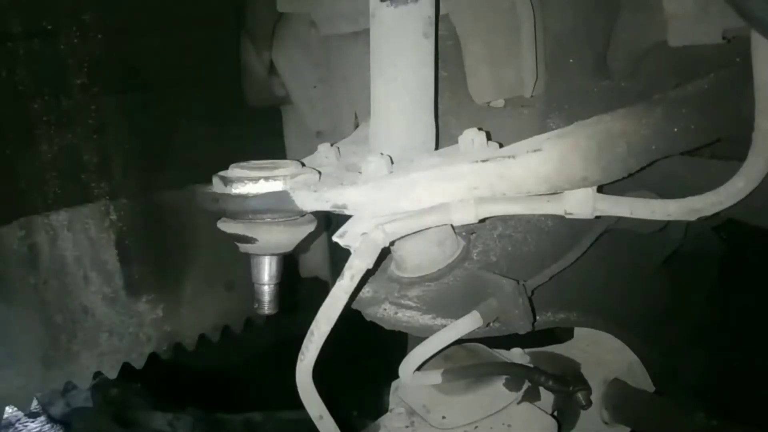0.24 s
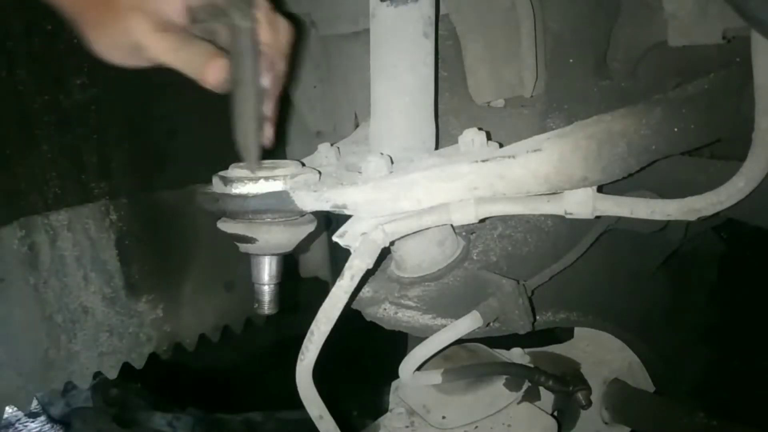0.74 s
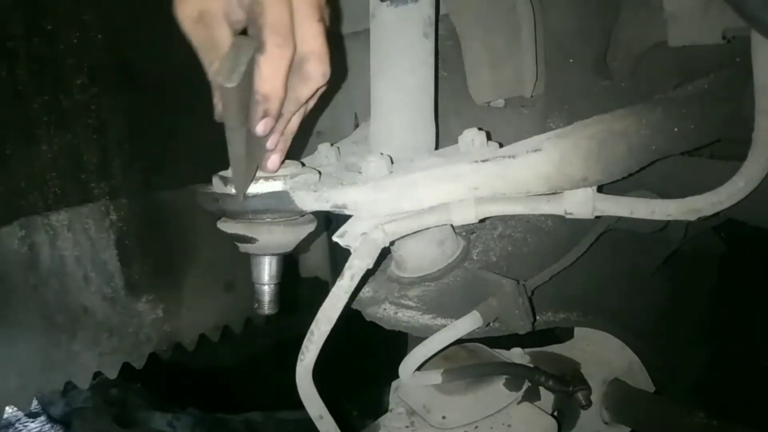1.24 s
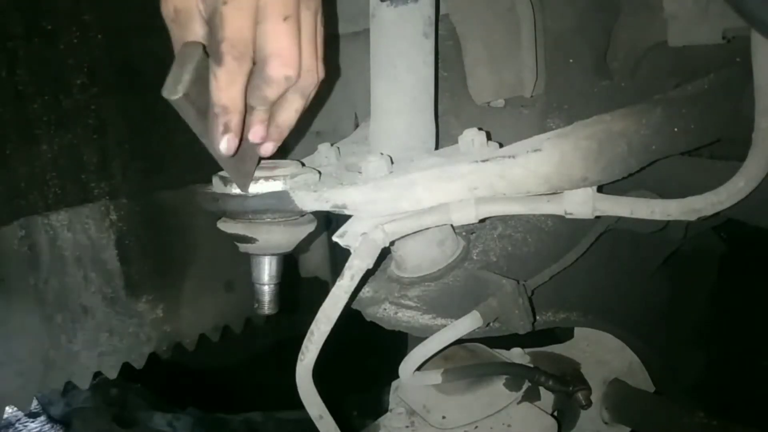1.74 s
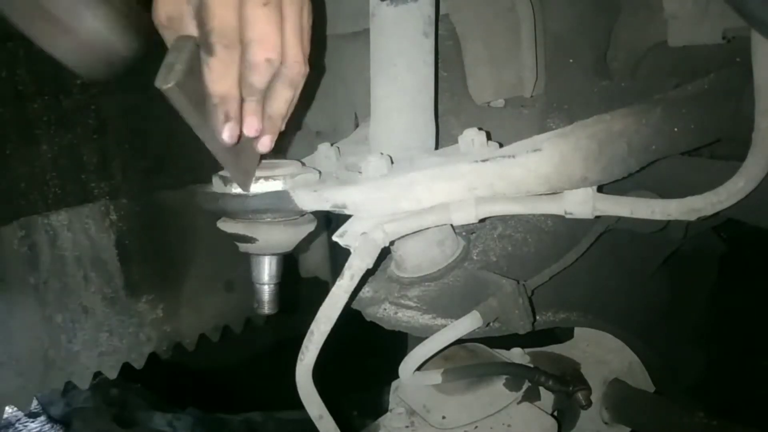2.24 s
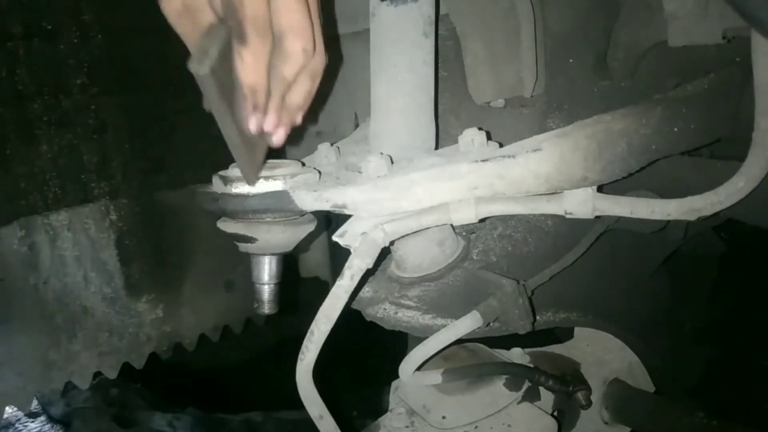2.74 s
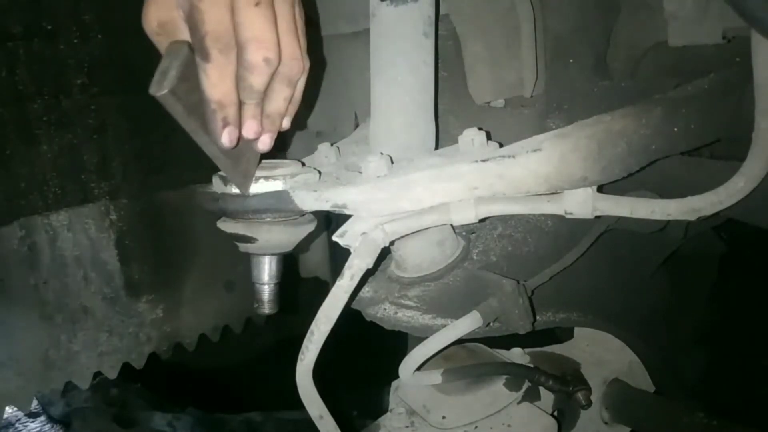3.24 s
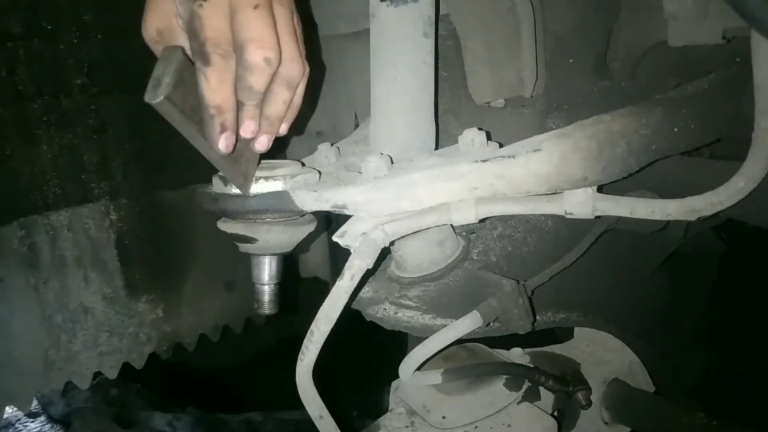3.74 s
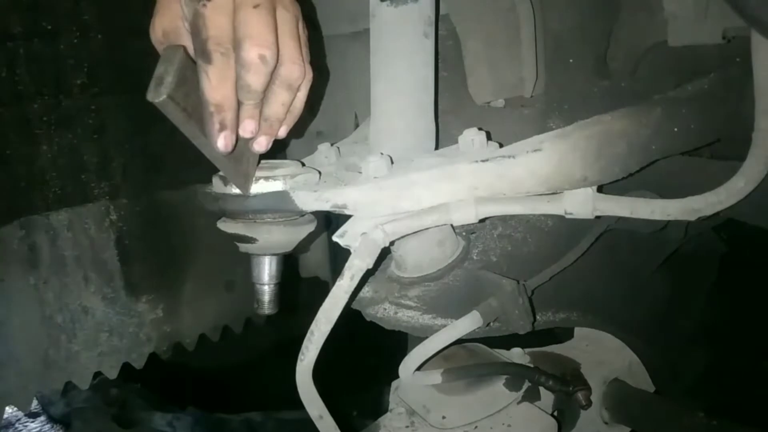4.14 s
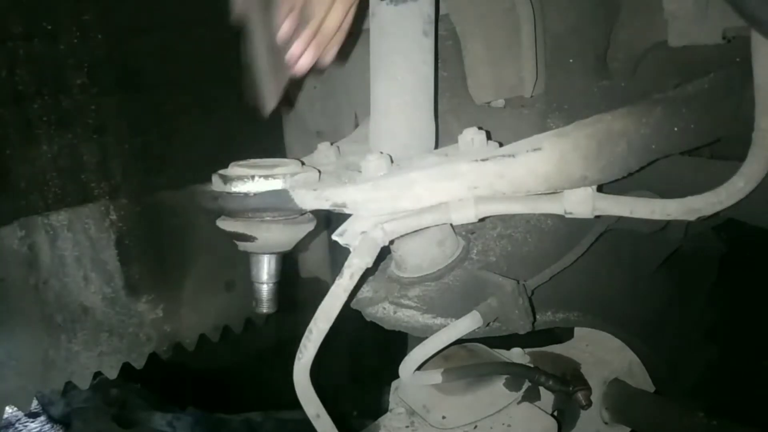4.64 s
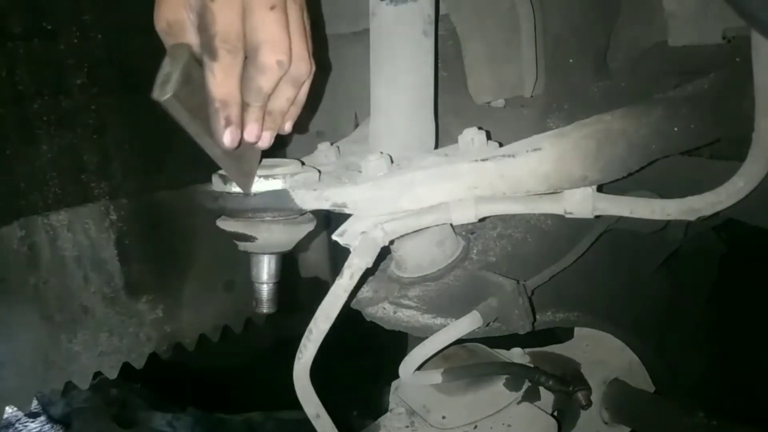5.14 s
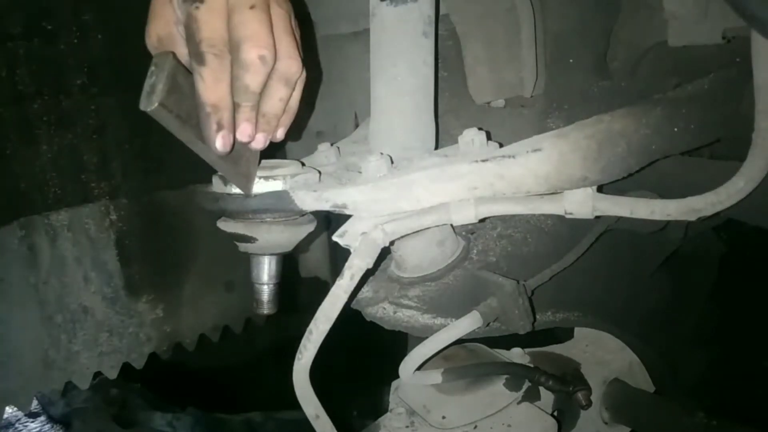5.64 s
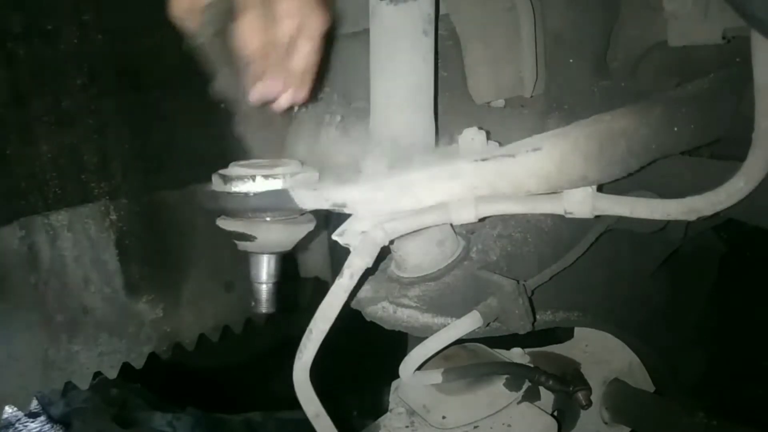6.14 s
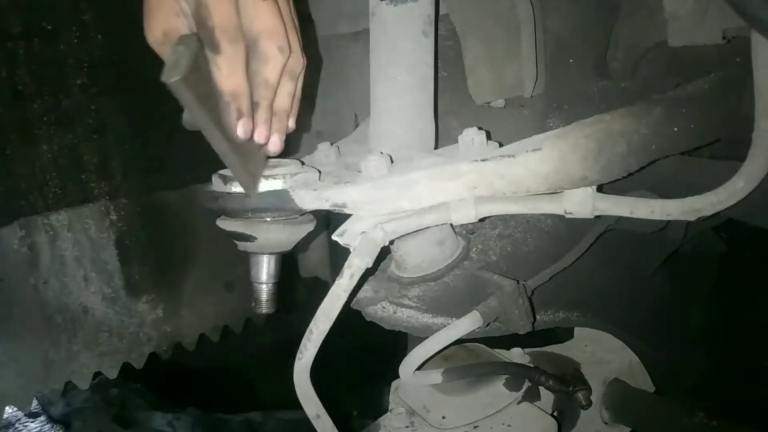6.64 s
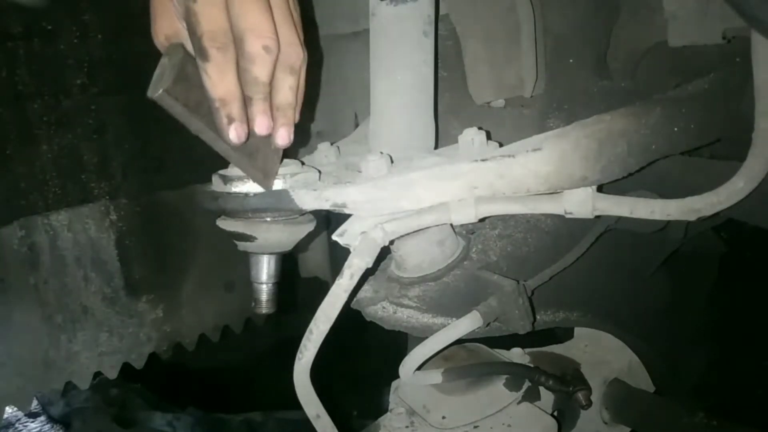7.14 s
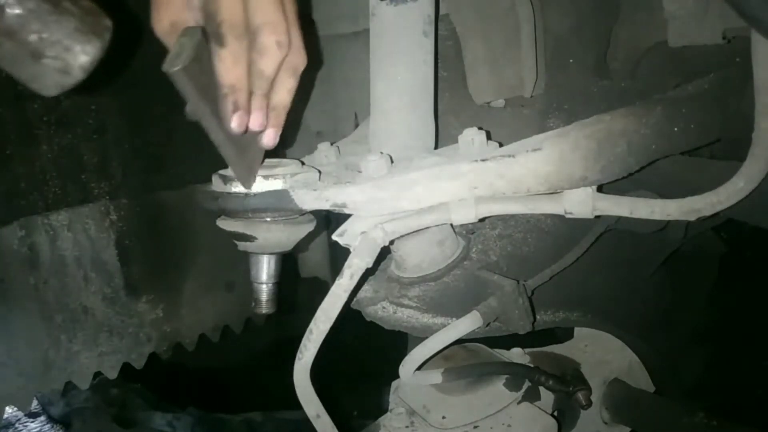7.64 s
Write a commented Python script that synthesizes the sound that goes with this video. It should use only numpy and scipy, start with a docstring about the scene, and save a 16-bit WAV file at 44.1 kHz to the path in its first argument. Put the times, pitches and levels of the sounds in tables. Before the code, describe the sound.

In a quiet workshop, fingers and steel scrape softly and a chisel tip knocks dully onto a suspension joint. Six loud hammer blows follow at uneven intervals, dense bright clangs with short rings and a brief room tail, clipping the close microphones. Between blows the tip ticks and clinks as it is set back in place over low hiss and rumble.

```python
"""Chisel blows on a suspension joint

A hammer drives a hand-held steel chisel against the joint in a quiet workshop, close to two microphones.
Each blow is a dense clang (shaped noise), clear rings (clusters of decaying modes) and a room tail; it
overloads the microphones (hard clipping). Around the blows the chisel tip taps and fingers and steel scrape
(clicks, grainy noise) over a hiss, a rumble and a thin whine (filtered noise)."""
import sys
import numpy as np
from scipy import signal
from scipy.fft import rfft, irfft, next_fast_len
from scipy.io import wavfile
from scipy.ndimage import uniform_filter1d

SR = 44100
rng = np.random.default_rng(int(sys.argv[2]) if len(sys.argv) > 2 else 0)


def put_to_file(sound):
    """Save the sound as 16-bit audio at rate SR, in the file named by the first command-line argument."""
    columns = np.atleast_2d(sound).T  # one column per channel
    safe = np.clip(columns, -1, 1)
    whole_steps = np.round(safe * 32767)
    wavfile.write(sys.argv[1], SR, whole_steps.astype(np.int16))


N = 347463

# Workshop noise spectrum, relative density: frequency_hz, density_db
FLOOR_SPECTRUM = [(15, 1.5), (28, -2), (45, -3.5), (100, -15), (250, -16), (600, -19.5), (1300, -20),
                  (3000, -28), (5000, -32), (8000, -32), (12000, -38), (15500, -41)]
# Steady tones of machines far off: centre_hz, width_hz, level_db
HUMS = [(126, 18, -66.5), (510.5, 11, -70), (824, 13, -70.5), (1460, 11, -62.5)]
# Likeness of the noise in the two channels: frequency_hz, correlation (-1 to 1)
LIKENESS = [(60, 0.92), (150, 0.88), (380, 0.54), (950, -0.19), (2380, -0.077), (5980, 0.18), (15000, 0.29)]
# Fingers and steel slide over each other: start_s, length_s, level_db, tilt_db_per_octave
SLIDES = [(0.001, 0.046, -50, -.5), (0.138, 0.27, -56.5, 1.5), (0.553, .02, -55.5, 3),
          (1.07, 0.08, -42, -3.5), (1.329, .12, -50, 3.5), (1.502, 0.17, -60.5, -1),
          (1.634, .03, -53.5, 3.5), (7.123, 0.13, -52.5, -7), (7.678, 0.045, -56, .6)]
# Clang spectrum, relative density: frequency_hz, density_db
CLANG_SPECTRUM = [(30, 5), (150, 0.5), (500, -1), (1100, 2.5), (2500, -0.5), (4500, -4), (7500, 2.5),
                  (9500, -1), (12000, -8.5), (15500, -2)]
# Decay of the steel before damping: frequency_hz, t60_s
STEEL_T60 = [(60, 0.74), (200, 0.95), (500, 0.18), (1200, 0.24), (3000, 0.23), (7000, 0.21), (11000, .15),
             (15500, 0.16)]
# Decay of the room: frequency_hz, t60_s
ROOM_T60 = [(60, 1.15), (200, .85), (600, 0.61), (2000, 0.55), (7000, 0.71), (15500, 0.4)]
# Modes that ring: part (0 chisel lengthwise, 1 hammer, 2 joint, 3 knuckle, 4 arm, 5 chisel tip,
# 6 chisel bending, 7 strut, 8 bolts), pitch_hz, spread_hz of its close modes,
# level_db over its part, t60_s before damping, left_minus_right_db
RINGS = [(0, 8353, 20, -4, .36, 0), (0, 8389, 20, -4, .36, 0), (1, 8672, 26, -4, .26, 0),
         (2, 1073, 14, -3, .9, 0.1), (2, 1120, 70, -.5, .2, 0.1), (2, 1846, 50, -11, .4, 0.1),
         (2, 2650, 120, -2.5, .25, 0.1), (2, 585, 30, -7, .6, 0.1), (3, 6660, 80, -.1, .5, 3),
         (4, 545, 35, 1.5, .6, 0.1), (4, 245, 30, -.5, .6, 0.1), (4, 165, 20, -2, .65, 0.1),
         (5, 5780, 150, -.1, .3, 0.1), (5, 9120, 70, -13, .35, 0.1), (5, 14850, 90, -10, .2, 0.1),
         (6, 3080, 85, -2.5, .5, 0.1), (7, 7500, 190, -.1, .25, 3), (7, 7900, 60, -6, .3, 0.1),
         (8, 10640, 160, -.1, .4, -3), (8, 11870, 60, -9, .3, -1), (8, 14300, 150, -5, .27, 0.1)]
# What drives each part, in part order: driver (rounds to 0 tools, 1 joint, 2 knuckle, 3 clang),
# level_db over the driver, change_db per doubling of ring-out up to 1
PARTS = [(0, -1, 1.3), (-0.5, 1, .1), (1, -2, 4.5), (2, 0.5, 3.4), (3, -15.5, 10), (2, -8.5, -1.1),
         (0.5, -12, -1), (1, 3.5, -1), (2, -5.5, 24)]
# The tip touches the joint: start_s, click_db, tilt_db_per_octave, joint_ring_db, tip_ring_db
TAPS = [(0.5825, -35, -8, -40, -66), (0.7667, -27, -11.5, -37.5, -68), (1.078, -22, -15, -39.5, -53),
        (1.139, -46, 0, -58, -63), (2.7137, -50, -6, -48.5, -50), (2.7893, -44.5, -12, -53, -38),
        (2.794, -36, -4.5, -46, -55), (2.848, -47, -4.5, -57, -43), (2.934, -42, -5.5, -59, -56),
        (3.0108, -32, 0, -47, -40), (3.0401, -35.5, 1, -50, -50), (4.265, -43, 7, -70, -66),
        (4.366, -45, -3.5, -70, -66), (4.7223, -37, -5.5, -48, -44), (4.7385, -30, -6, -50, -38),
        (6.3865, -44, -2.5, -42, -67), (6.768, -68, 1.5, -54, -47.5), (6.9448, -53, 3, -47, -62),
        (7.121, -55, -6, -50, -62), (7.165, -54, -3, -45, -50), (7.19, -55, -6, -51, -63),
        (7.4202, -33, -5.5, -42, -37)]
# Lone bright pings of small parts: start_s, pitch_hz, level_db, t60_s
PINGS = [(3.0108, 4750, -33, 0.076), (3.0408, 4660, -43, 0.06), (7.057, 11450, -49.5, 0.26)]
# Hammer blows: middle_of_rise_s, clang_db, crack_db over it, rise_s, skid_s of the chisel,
# ring_out (decay factor), tools_ring_db, joint_ring_db, knuckle_ring_db,
# left_swing and right_swing (full scale, before the high-pass), left_lag_s
BLOWS = [(1.9255, -11.5, 11.5, 0.0019, 0.011, 1, -7, -39, -21, 0.71, .13, .001),
         (3.327, -9, 11, 0.0027, 0.0046, 0.55, -22, -28, -24, .03, -.06, .002),
         (3.989, -7.5, -3, 0.0077, 0.012, 1.39, -7, -22, -28, 0.4, 0.62, 0.037),
         (5.1432, -8.5, 1, 0.0014, 0.0051, 0.55, -25, -27, -27, 0.00073, -.075, .002),
         (5.823, -6.5, 0, .006, 0.022, 1.316, -19, -23, -12, -.14, -.1, 0.01),
         (7.789, -10.5, -0.5, 0.0009, 0.0058, 0.42, -34, -31, -27, 0.064, 0.0033, .001)]
# Air pocket before the left and right capsule: centre_hz, width_hz, gain_db
PORTS = [(6770, 1600, 9.5), (10930, 1600, 12.5)]

HZ = np.fft.rfftfreq(512, 1 / SR)[:, None]  # bins of the short-time frames
FLOOR_DB = -50  # before the hums, the waver and the ports
RUSTLE_LOW_HZ = 905
SLIDE_RISE_DB_PER_S, SLIDE_FADE_DB, SLIDE_STOP_DB_PER_S = 350, -6, 299.5
ROOM_TILT_DB = -2.5  # per octave: the walls swallow treble
CLICK_T60_FACTOR, HELD_T60_FACTOR = 0.4, 0.27  # steel of a tap's click, rings under the hand
# each follows the ring-out: (value at ring-out 1, change per doubling)
TILT_DB, THUD_DB, ROOM_DB, FREE_DB = (-0.83, 1.5), (-2.5, 6.5), (-7.5, 9.5), (4, -11)
RING_OUT_POWER = .25  # rings lengthen less than the clang does
SWING_S = .07
EDGE_HZ = 15773  # upper band limit


def gain_of(db):
    """Level law: 20 dB is a tenfold amplitude."""
    return 10 ** (np.asarray(db) / 20)


def read(points, hz):
    """Interpolation of a spectrum or decay table on a log-frequency axis."""
    table_hz, value = np.transpose(points)
    return np.interp(np.log(hz + 1), np.log(table_hz + 1), value)


def follow(rule, ring_out):
    """Logarithmic law: a value moves by a fixed step per doubling of ring-out."""
    return rule[0] + rule[1] * np.log2(ring_out)


def add(mix, s, sound):
    """Superposition: a sound is summed into the mix from s seconds on."""
    part = mix[:, round(s * SR):][:, :sound.shape[1]]
    part += sound[:, :part.shape[1]]


def frame_times(count):
    """Time grid of the short-time frames that cover count samples."""
    return np.arange(count // 128 + 5) * 128 / SR


def likened(first, second, hz):
    """Partial coherence: the right channel shares a set part of the left at each frequency."""
    same = np.clip(read(LIKENESS, hz), -1, 1)
    return np.array([first, same * first + np.sqrt(1 - same ** 2) * second])


def noise(magnitude, count):
    """Short-time synthesis of noise from frequency x time; a unit-length column gives about rms 1."""
    a, b, c, d = rng.standard_normal(magnitude.shape[::-1] + (4,)).T
    spectrum = likened(a + 1j * b, c + 1j * d, HZ) * magnitude
    return signal.istft(spectrum, nperseg=512, noverlap=384)[1][:, :count]


def tilted(db, tilt_db):
    """Spectral tilt: a spectrum leans about 4 kHz and is scaled to unit length."""
    gain = gain_of(db + tilt_db * np.log2((HZ + 300) / 4000))
    return gain / np.linalg.norm(gain, axis=0)


def workshop():
    """Stationary noise: hiss, rumble and narrow bands of far machines under a wavering level."""
    size = next_fast_len(N)
    hz = np.fft.rfftfreq(size, 1 / SR)
    first, second = rfft(rng.standard_normal((2, size)))
    shape = gain_of(read(FLOOR_SPECTRUM, hz)) * (hz > 9)
    power = gain_of(2 * FLOOR_DB) * shape ** 2 / np.mean(shape ** 2)
    for centre_hz, width_hz, db in HUMS:
        line = 1 / (1 + (2 * (hz - centre_hz) / width_hz) ** 4)
        power = power + gain_of(2 * db) * line / np.mean(line)
    steady = irfft(likened(first, second, hz) * np.sqrt(power), size)[:, :N]
    waver = uniform_filter1d(uniform_filter1d(rng.standard_normal(N), 3000), 3000)
    return steady * gain_of(waver / waver.std())  # 1 dB rms


def rustle():
    """Sliding friction: grainy noise, thin in the bass, swells in, sags as it runs and stops."""
    t = frame_times(count=N)
    grain_db = 1.5 * rng.standard_normal(len(t))
    bass_cut_db = -10 * np.log10(1 + (RUSTLE_LOW_HZ / (HZ + 1)) ** 4)
    treble_cut_db = -10 * np.log10(1 + (HZ / 11000) ** 6)
    power = 0
    for s, length, db, tilt_db in SLIDES:
        swell_db = -SLIDE_RISE_DB_PER_S * np.maximum(s - t, 0)
        sag_db = SLIDE_FADE_DB * np.clip((t - s) / length, 0, 1)
        stop_db = -SLIDE_STOP_DB_PER_S * np.maximum(t - s - length, 0)
        level = gain_of(db + swell_db + sag_db + stop_db + grain_db)
        power = power + (tilted(bass_cut_db + treble_cut_db, tilt_db) * level) ** 2
    return noise(np.sqrt(power), count=N)


def attack(rise, count):
    """Contact force: a quick squared rise from the first touch."""
    return np.clip(np.arange(count) / SR / abs(rise), 0, 1) ** 2


def clang(db, crack_db, rise, skid, tilt_db, thud_db, damping, room_db, count):
    """Modal overlap: countless plate and rod modes blur to lumpy noise that dies by band, over a room tail."""
    t = frame_times(count=count)
    after = np.maximum(t - skid, 0)  # the steel is fed for as long as the tip skids
    # some modes are caught harder, some last longer
    loud, long = rng.standard_normal((2, len(HZ), 1)) * np.minimum(HZ / 1500, 1)
    steel_t60 = damping * read(STEEL_T60, HZ) * np.exp(.13 * long)
    steel = gain_of(3.5 * loud - 60 * after / steel_t60)
    room_colour_db = 1.3 * loud + ROOM_TILT_DB * np.log2((HZ + 300) / 2000)
    room = gain_of(room_db + room_colour_db - 60 * after / read(ROOM_T60, HZ))
    thud = gain_of(thud_db / (1 + (HZ / 330) ** 4))
    colour = tilted(read(CLANG_SPECTRUM, HZ), tilt_db) * thud
    build = np.minimum((t + 0.0019) * HZ / 5.2, 1)  # low modes need a few cycles to speak
    body = noise(colour * build * np.hypot(steel, room), count=count)
    crack = gain_of(crack_db * np.exp(-np.arange(count) / SR / 0.0053))
    return gain_of(db) * body * attack(rise, count=count) * crack


def ring(hz, spread_hz, db, t60, pan_db, count):
    """Beating: a leading mode and eight close ones die together, with other phases at each capsule."""
    t, step = np.arange(count) / SR, 8
    offsets, phases = spread_hz * rng.standard_normal((9, 1)), rng.uniform(0, 2 * np.pi, (2, 9))
    offsets[0] = 0
    # long waves reach both capsules nearly in step
    phases[1] = phases[0] + hz / 1400 * rng.standard_normal(9)
    weights = np.r_[1 + 35 / abs(spread_hz), np.ones(8)]  # in a tight cluster one mode rules
    turning = np.exp(2j * np.pi * offsets * t[::step])
    beats = weights * np.exp(1j * phases) @ turning / np.linalg.norm(weights)
    side_db = np.array([[pan_db], [-pan_db]]) / 2
    slow = beats * gain_of(db - 60 * t[::step] / t60 + side_db)
    return (np.repeat(slow, step, 1)[:, :count] * np.exp(2j * np.pi * hz * t)).real


def rings(part_db, damping, count):
    """Modal superposition: the parts named in part_db ring, each as hard as it was caught."""
    return sum(ring(hz, spread_hz, db + part_db[part], t60 * damping, pan_db, count=count)
               for part, hz, spread_hz, db, t60, pan_db in RINGS if part in part_db)


def taps():
    """Light impact: a short click, joint and tip damped by the hand, and lone pings of small parts."""
    out, count = np.zeros((2, N)), SR // 6
    for s, db, tilt_db, joint_db, tip_db in TAPS:
        click = clang(db, crack_db=3.1, rise=0.00053, skid=0.0048, tilt_db=tilt_db, thud_db=-16.5,
                      damping=CLICK_T60_FACTOR, room_db=-13.5, count=count)
        ringing = rings({2: joint_db, 5: tip_db}, HELD_T60_FACTOR, count=count)
        add(out, s, click + ringing * attack(0.00077, count=count))
    for s, hz, db, t60 in PINGS:
        ping = ring(hz, spread_hz=92, db=db, t60=t60, pan_db=0, count=count)
        add(out, s, ping * attack(0.00091, count=count))
    return out


def hammer():
    """Impact excitation: every blow is a clang plus rings of nine parts; ring-out sets tone and room."""
    out, count = np.zeros((2, N)), 2 * SR // 3
    for s, db, crack_db, rise, skid, ring_out, tools_db, joint_db, knuckle_db, *_ in BLOWS:
        tilt_db, thud_db = follow(TILT_DB, ring_out), follow(THUD_DB, ring_out)
        room_db, free_db = follow(ROOM_DB, ring_out), follow(FREE_DB, ring_out)
        # hand and joint soon grip the steel again
        free = gain_of(free_db * np.exp(-np.arange(count) / SR / .016))
        drives = tools_db, joint_db, knuckle_db, db
        part_db = {part: drives[round(driver)] + follow(rule, min(ring_out, 1))
                   for part, (driver, *rule) in enumerate(PARTS)}
        ringing = rings(part_db, ring_out ** RING_OUT_POWER, count=count)
        ringing = ringing * attack(rise + .3 * skid, count=count) * free
        body = clang(db, crack_db, rise, skid, tilt_db, thud_db, ring_out, room_db, count=count)
        add(out, s - rise / 2, body + ringing)
    return out


def swings():
    """High-pass response: blows push the capsules off rest; the coupling capacitor adds an undershoot."""
    out, u = np.zeros((2, N)), np.linspace(0, 1, round(SWING_S * SR))
    push = np.sin(np.pi * u ** .8)[None] ** 2
    for s, *_, left, right, left_lag in BLOWS:
        add(out[:1], s + abs(left_lag), left * push)
        add(out[1:], s, right * push)
    return signal.lfilter(*signal.butter(N=1, Wn=1.6, btype="high", fs=SR), out)


def ports(x):
    """Cavity resonance: each capsule sits behind its own small resonant hole."""
    lifted = [signal.lfilter(*signal.iirpeak(hz, hz / width_hz, SR), channel) * (gain_of(db) - 1)
              for channel, (hz, width_hz, db) in zip(x, PORTS)]
    return x + np.array(lifted)


def scene():
    """Superposition of all sources at the capsules."""
    return ports(workshop() + rustle() + taps() + hammer()) + swings()


def record(dry):
    """Overload: hard clipping at full scale, then the band limit."""
    clipped = np.clip(dry, -1, 1)
    low_pass = signal.firwin(511, EDGE_HZ, window=("kaiser", 7), fs=SR)
    limited = signal.oaconvolve(clipped, low_pass[None], "same")
    return np.clip(limited, -1, 1)  # filter overshoot meets the same ceiling


dry = scene()
out = record(dry)
put_to_file(out)
```